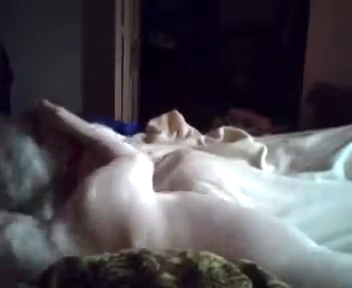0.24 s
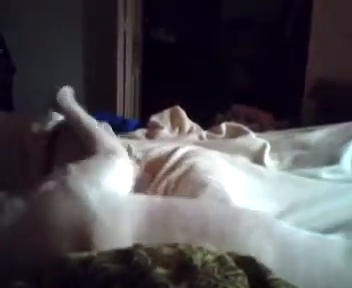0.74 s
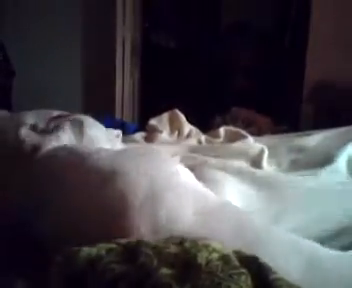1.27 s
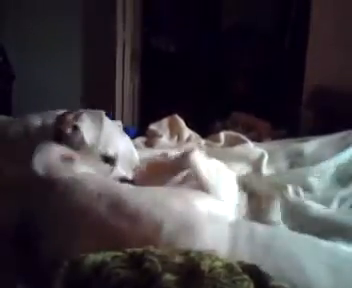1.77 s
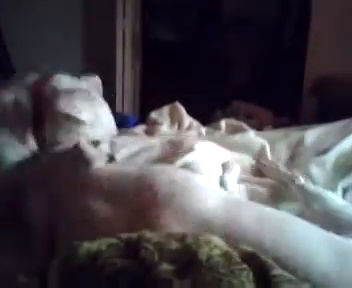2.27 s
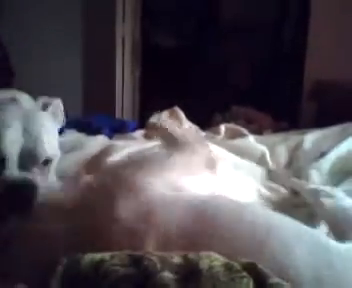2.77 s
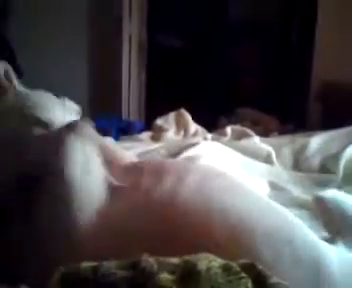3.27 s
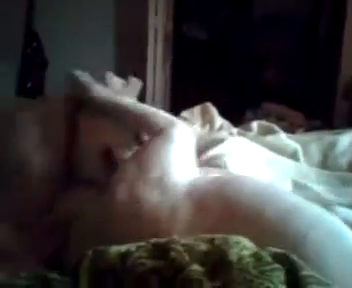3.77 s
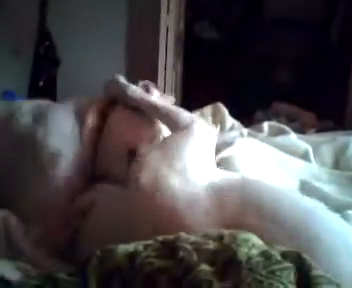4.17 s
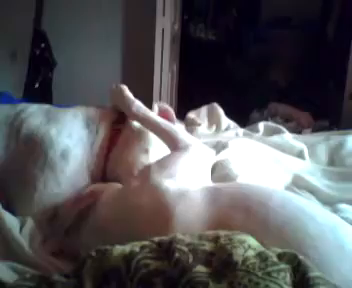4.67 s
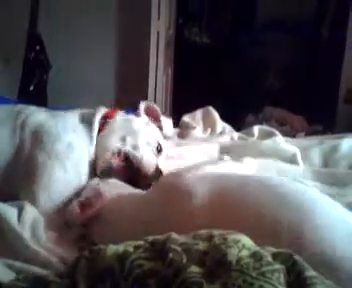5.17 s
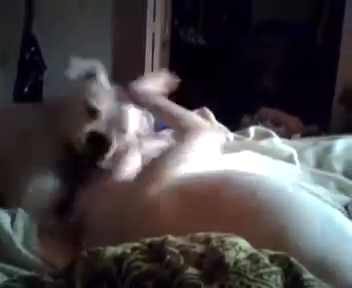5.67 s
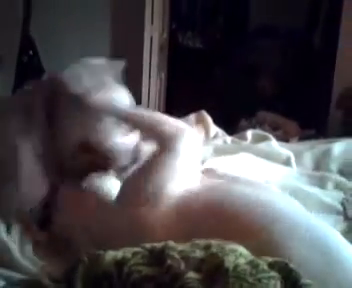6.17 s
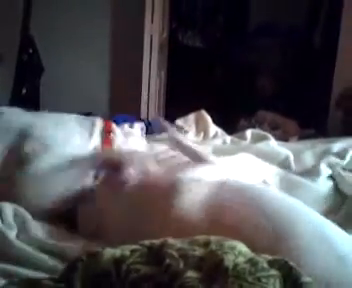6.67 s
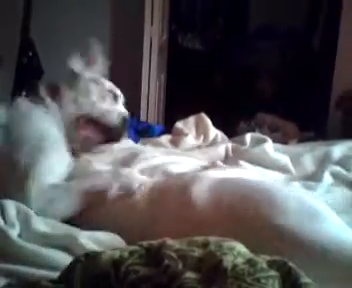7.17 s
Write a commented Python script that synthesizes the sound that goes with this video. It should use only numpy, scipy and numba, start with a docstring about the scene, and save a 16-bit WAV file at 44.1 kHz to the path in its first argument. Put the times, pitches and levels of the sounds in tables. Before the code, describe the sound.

A quiet bedroom with faint fan-like air, recorded close on a small, dull microphone. At 0.3 s a short gurgling growl flutters, then sheets rustle and paws thump softly on bedding until 1.3 s, with one wet click at 1.2. From 1.7 to 2.4 s a low, rattling growl runs with breathy hiss and mattress rumble. After a small snort at 2.6, a rougher, wetter growl builds from 2.8 to 3.4 s in rapid flaps and spit sizzles. The loudest low grunts come between 3.55 and 4.1 s, voiced and throaty, with hard jaw snaps around 3.9 to 4.0. A quieter crackling growl grumbles from 4.5 to 5.3 s, and another from 5.5 to 6.1. A sharp, wet snarl bursts at 6.2 s with teeth clicking. Padded thumps follow at 6.6 to 6.85, a clicking short grunt at 7.1, and a final hissy growl from 7.25.

```python
"""On a bed in a quiet room, close to a small camera, two young dogs wrestle.
Uneven vocal-fold slaps and puffs of noise ring chest, throat and mouth; a few grunts hold a clear note.
Slack tissue flaps open in bursts, spit sizzles, jaws snap, and air hisses past teeth and nostrils.
Paws thump, sheets rustle and the mattress rumbles in bands of noise, over a faint fan-like floor."""
import sys
import numpy as np
from scipy import signal
from scipy.io import wavfile
from scipy.ndimage import uniform_filter1d
from numba import njit

SR = 44100
rng = np.random.default_rng(int(sys.argv[2]) if len(sys.argv) > 2 else 0)


def wrap_up_sound(samples):
    """Save the sound to the file named by the first command line argument, as 16-bit audio."""
    columns = np.atleast_2d(samples).T
    # keep every value between -1 and 1, then stretch to whole-number steps
    tamed = np.clip(columns, -1, 1)
    steps = np.round(tamed * 32767).astype(np.int16)
    wavfile.write(sys.argv[1], SR, steps)


N = 327618
T = np.arange(N) / SR

# gusts of air past teeth and nostrils:
# (full from [t/s], hold [s], mouth jet [level/dB], jet centre [f/Hz], nostrils relative to mouth [dB])
HISS = [(0.07, 0.061, -78.5, 3790, -4.5), (0.26, 0.14, -71.5, 3650, -8), (0.89, 0.14, -75, 3660, -6.5),
        (1.208, 0.1, -81.5, 3570, 5.5), (1.729, 0.06, -61.5, 2860, -10), (1.779, 0.07, -61.5, 3580, -10),
        (2.397, 0.036, -65.5, 2600, -23), (2.577, 0.019, -67.5, 2780, -33), (2.844, 0.3, -80, 3580, -3),
        (3.265, 0.03, -64, 3410, -6), (3.35, 0.066, -72, 2870, -20), (3.506, 0.011, -59, 2810, -25),
        (3.611, 0.017, -65.5, 3800, -7.5), (4.323, 0.013, -78, 2850, -16), (5.184, 0.05, -69, 3420, -2.5),
        (5.29, .03, -72, 3300, 0), (5.807, 0.057, -60.5, 2770, -14), (5.885, .08, -64.5, 3710, -8.5),
        (6.194, .015, -60.5, 3660, -15), (6.222, 0.035, -54, 2840, -22), (6.258, .025, -59.5, 3210, -15),
        (6.34, .13, -72.5, 2990, -11), (7.276, 0.015, -63.5, 3210, -13.5), (7.359, 0.085, -59, 3580, -30)]
# slack tissue flapping open: (start [t/s], peak [level/dB], ring [f/Hz])
FLAPS = [(0.319, -33, 730), (.329, -44.5, 560), (.352, -38.5, 960), (.36, -44, 920), (.37, -42, 635),
         (.38, -43.5, 910), (1.237, -31, 1040), (1.694, -42, 1100), (1.83, -36, 614), (1.928, -39, 980),
         (1.965, -44, 633), (1.996, -40.5, 585), (2.049, -45, 750), (2.096, -41, 930), (2.171, -33, 775),
         (2.236, -41, 544), (2.554, -56, 606), (2.57, -39.5, 840), (2.811, -29.5, 935), (2.821, -47, 975),
         (2.862, -36, 880), (2.908, -32.5, 545), (2.966, -31, 630), (3.016, -29.5, 617), (3.061, -27, 720),
         (3.107, -35, 940), (3.148, -34.5, 910), (3.187, -29, 630), (3.234, -28.5, 930),
         (3.248, -27.5, 600), (3.263, -25.5, 960), (3.296, -27.5, 990), (3.357, -31, 670),
         (3.581, -32.5, 550), (3.611, -25.5, 510), (3.705, -27, 516), (3.833, -33.5, 560),
         (3.899, -27.5, 740), (3.95, -28.5, 582), (4.008, -24, 732), (4.16, -34, 546), (4.319, -35.5, 710),
         (4.56, -60, 530), (4.587, -37, 570), (4.644, -35, 597), (4.693, -41, 930), (4.743, -39, 470),
         (4.805, -44.5, 635), (4.85, -45, 990), (4.885, -37, 630), (4.931, -41, 536), (4.978, -42, 546),
         (5.035, -39, 970), (5.079, -45, 1000), (5.166, -47, 500), (5.243, -41, 560), (5.682, -43, 550),
         (5.832, -41, 1080), (6.195, -36, 500), (6.209, -39, 880), (6.22, -22.5, 617), (6.234, -21.5, 970),
         (6.249, -34.5, 1070), (6.275, -28.5, 614), (6.287, -31.5, 1000), (6.338, -40, 1190),
         (6.377, -39, 1150), (6.405, -50, 1220), (6.43, -35, 1060), (6.455, -41, 1090), (7.075, -32.5, 560),
         (7.085, -36, 478), (7.093, -34.5, 754), (7.245, -52, 996), (7.282, -33, 1100), (7.356, -33.5, 503)]
# clear grunts, one list of points each: (t/s, pitch [f/Hz], level/dB)
GRUNTS = [
    [(3.56, 85, -35.5), (3.575, 89.3, -41), (3.61, 104.4, -37), (3.64, 117.7, -44.5), (3.655, 125, -52)],
    [(3.675, 146.4, -47.5), (3.694, 155, -27.5), (3.708, 156, -19), (3.722, 157, -40), (3.73, 170, -24),
     (3.742, 173.7, -36.5), (3.76, 170, -48.5)],
    [(3.85, 134.5, -46), (3.874, 148, -27.5), (3.908, 155, -29.5), (3.924, 172.6, -27), (3.934, 178, -36.5),
     (3.944, 178, -28.5), (3.972, 161.8, -37), (3.988, 162, -29), (4.008, 185, -26), (4.024, 149, -47),
     (4.034, 123.4, -31.5), (4.046, 133, -31), (4.066, 148.5, -28), (4.084, 150, -36), (4.105, 150, -48.5)],
    [(7.076, 175, -58), (7.086, 175, -24.5), (7.104, 182.5, -50), (7.132, 185, -37), (7.15, 193, -71)],
]
# fixed throat resonances: (f/Hz, nominal width [Hz], relative level/dB)
THROAT = [(417, 310, -0.5), (560, 150, 4.5), (694, 330, 0.5)]
# muzzle resonances at rest: (f/Hz, nominal width [Hz], relative level/dB)
MUZZLE = [(975, 110, 1.5), (1081, 280, -4.5)]


def undb(db):
    """Decibels to an amplitude factor."""
    return 10 ** (np.asarray(db) / 20)


def unit(x):
    """Scale to an RMS level of 1."""
    return x / np.sqrt(np.mean(x ** 2))


def peak(x, db):
    """Scale to a peak level in dB."""
    return x * undb(db) / np.max(np.abs(x))


def noise():
    """White noise for the whole scene."""
    return rng.standard_normal(N)


def walk(rate):
    """Random levels held 1 / rate s and smoothed twice into a drift; standard deviation about 0.7."""
    k = int(SR / rate)
    steps = np.repeat(rng.standard_normal(N // k + 1), k)
    return 0.94 * uniform_filter1d(uniform_filter1d(steps, k), k)[:N]


def curves(tables):
    """A gate that is open while a table runs, then the columns joined in time with rounded corners."""
    s, *columns = np.concatenate(tables).T
    gate = 1. * sum((T >= table[0][0]) & (T < table[-1][0]) for table in tables)
    joined = [np.interp(T, s, column) for column in columns]
    return [uniform_filter1d(c, size=200) for c in [gate] + joined]


def swells(full_from, hold, db, rise_db_s, fall_db_s):
    """Level in dB of each swell: a steady climb, a hold, a steady fall."""
    late = T - full_from[:, None]
    climb = np.minimum(rise_db_s * late, 0)
    fall = fall_db_s * np.maximum(late - hold[:, None], 0)
    return db[:, None] + climb - fall


@njit
def svf(x, hz, width):
    """State-variable band-pass with a moving centre, gain 1 there."""
    y, b, l = np.empty(len(x)), 0., 0.
    for i in range(len(x)):
        g, k = np.tan(np.pi * hz[i] / SR), width / hz[i]
        v = (b + g * (x[i] + 1e-18 - l)) / (1 + g * (g + k))
        b, l, y[i] = 2 * v - b, l + 2 * g * v, k * v
    return y


def band(x, hz, width):
    """A resonance applied twice, so that its skirts are steep; the centre may be a curve, width is nominal."""
    if np.ndim(hz):
        return svf(svf(x, hz, 1.29 * width), hz, 1.29 * width)
    b, a = signal.iirpeak(hz, hz / width / 1.02, SR)
    return signal.lfilter(b, a, signal.lfilter(b, a, x))


def tract(x, modes):
    """Resonances in parallel, neighbours in opposite sign."""
    return sum((-1) ** k * undb(db) * band(x, hz, width) for k, (hz, width, db) in enumerate(modes))


def soft(x, hz):
    """Flesh meets flesh: a two-pole low-pass rounds the click."""
    return signal.sosfilt(signal.butter(2, hz, fs=SR, output="sos"), x)


def mattress():
    """Bodies shift on springs and padding: a deep uneven rumble on a slow sway of the air."""
    # bodies shifting: (loudest at [t/s], level/dB of the rumble band)
    shifts = [(0., -55), (.35, -58), (1.03, -55), (1.2, -53.5), (1.8, -46.5), (2.26, -54.5), (3.02, -66),
              (3.64, -49.5), (4.07, -47), (5.21, -66), (6., -58), (6.23, -57), (7.26, -56)]
    rest_db, rise_db_s, fall_db_s = -63, 98, 83
    s, db = np.transpose(shifts)
    level_db = swells(s, 0 * s, db, rise_db_s, fall_db_s).max(axis=0)
    rumble = unit(band(noise(), 25.0, 55.0))
    sway = 1.7 * unit(band(noise(), 9.7, 2.8))
    return undb(np.maximum(level_db, rest_db)) * (rumble + sway)


def floor():
    """Steady room air in gently flickering bands, with a few thin motor-like tones."""
    # spectrum of the air: (f/Hz, relative level/dB per Hz)
    air_spectrum = [(35, -30), (60, 0), (232, -6), (379, -11), (515, -11), (808, -17), (1010, -14),
                    (1320, -23), (1650, -25), (1790, -24), (2440, -31), (6390, -44), (8000, -55),
                    (10400, -85), (17600, -120)]
    # thin tones: (f/Hz, peak level/dB)
    whine = [(759.0, -88.5), (1012, -76), (1776, -82)]
    air_db = -62.5
    hz, db = np.transpose(air_spectrum)
    air = np.zeros(N)
    for f in 70 * 2 ** np.arange(0, 7, .5):  # half-octave steps
        band_db = np.interp(np.log(f), np.log(hz), db) + 3.7 * walk(1.4)
        air += undb(band_db) * band(noise(), f, f / 1.93)
    tones = np.zeros(N)
    for f, tone_db in whine:
        tones += undb(tone_db + 1.5 * walk(8)) * np.sin(2 * np.pi * f * T + 1.5 * walk(22))
    return undb(air_db) * unit(air) + tones


def gusts():
    """Level in dB of every gust of air over time."""
    full_from, hold, db = np.transpose(HISS)[:3]
    return swells(full_from, hold, db, rise_db_s=333.5, fall_db_s=306)


def hiss(puffs):
    """Air jets through teeth and nostrils: noise bands pulsing with the folds and sputtering."""
    pant_db, pant_nose_db = -87, -92  # air that passes all the time
    centre_hz, nose_share_db = np.transpose(HISS)[3:]
    gust_db = gusts()
    mouth_db = np.maximum(gust_db.max(axis=0), pant_db)
    nose_db = np.maximum((gust_db + nose_share_db[:, None]).max(axis=0), pant_nose_db)
    # the loudest gust sets the centre
    mouth_hz = uniform_filter1d(centre_hz[gust_db.argmax(axis=0)], size=800)
    jet = 0.31 + unit(puffs ** 0.96)
    mouth_air = jet * undb(3.5 * walk(90)) * noise()
    mouth = unit(band(mouth_air, mouth_hz * (1 + .05 * walk(30)), 750.))
    nose_air = jet * undb(5.4 * walk(70)) * noise()
    nose = unit(band(nose_air, 6140.0, 1700.0))
    return undb(mouth_db) * mouth + undb(nose_db) * nose


def thumps():
    """Paws and chins land on the bedding: a padded push and a few dying swings."""
    # landings: (start [t/s], peak [level/dB], ring [f/Hz], nominal ring length [s])
    landings = [(0.103, -51, 966, 0.038), (0.828, -47.5, 200, 0.027), (0.845, -44.5, 450, .012),
                (0.936, -41.5, 484, 0.019), (1.006, -49.5, 300, 0.019), (1.02, -41, 390, 0.013),
                (1.032, -45, 350, 0.016), (1.186, -33.5, 262, 0.016), (1.196, -36, 297, .015),
                (1.286, -40, 180, 0.029), (1.645, -41.5, 150, 0.069), (1.66, -38.5, 170, 0.06),
                (2.549, -39, 139, 0.042), (5.401, -49, 178, 0.025), (6.588, -35, 230, 0.061),
                (6.641, -45, 227, 0.047), (6.687, -47, 310, 0.031), (6.69, -33, 155, 0.036),
                (6.752, -33.5, 200, 0.035), (6.781, -36.5, 155, .04), (6.844, -41.5, 160, 0.065)]
    out, t = np.zeros(N + 4096), T[:4096]
    for s, db, hz, ring_s in landings:
        push = (t == t[1]) + 0.1 * rng.standard_normal(4096) * np.exp(-t / 0.0032)
        out[int(s * SR):][:4096] += peak(band(soft(push, 660.0), hz, 6.1 / ring_s), db)
    return out[:N]


def growl_controls():
    """Gate, chest level and opening over time, with what each growl keeps throughout."""
    # one row per growl: (nominal chest resonance [f/Hz], belly relative to chest [dB],
    # mouth relative to muzzle [dB], points of (t/s, chest level/dB, opening: muzzle relative to chest [dB]))
    growl_shapes = [ (200, 6, -2, [(0.275, -61, -33), (0.295, -43, -10), (0.359, -39.5, 2),
                    (0.411, -71.5, 4), (0.43, -75, -16)]), (170, 5.5, -15, [(1.232, -60.5, 11),
                    (1.3, -67, 10.5), (1.32, -92, -6)]), (211, -12.5, -15, [(1.55, -71, -30),
                    (1.6, -63, -34), (1.65, -58, -25.5), (1.682, -59, -23), (1.693, -40, -15),
                    (1.722, -41, -11.5), (1.77, -39, -8), (1.83, -36, -13.5), (1.87, -39.5, -12),
                    (1.91, -39.5, -8.5), (1.94, -38, -8.5), (1.98, -41, -11), (2.01, -41, -10.5),
                    (2.05, -39.5, -10), (2.085, -40, -8.5), (2.12, -40.5, -8), (2.17, -38.5, -12),
                    (2.215, -41, -11), (2.25, -42.5, -11), (2.306, -44, -9), (2.366, -46, -10),
                    (2.402, -59.5, 0.5), (2.444, -53, -0.5), (2.5, -97, -16)]),
                    (155, 6.5, -3, [(2.53, -64, -22), (2.568, -55.5, 8), (2.652, -94, 20),
                    (2.7, -91, -19)]), (204, -9.5, -12.5, [(2.8, -55, 2), (2.81, -43, 4),
                    (2.878, -48.5, -7), (2.926, -40, -22), (2.97, -37.5, -11.5), (3.005, -47, -14),
                    (3.03, -37, -14), (3.07, -43, 0), (3.102, -40.5, -8), (3.16, -41.5, -4),
                    (3.223, -33.5, -16)]), (200, -4.5, -9, [(3.224, -37, 2), (3.268, -36, 2.5),
                    (3.294, -39, -1), (3.33, -35, -5.5), (3.376, -44, -5.5), (3.5, -53, 2),
                    (3.549, -49.5, -8)]), (185, 0.5, -1.5, [(3.55, -65, 2), (3.574, -25.5, -19.5),
                    (3.67, -41, -10.5), (3.679, -40, -7)]), (172, -10.5, -5, [(3.68, -29.5, -5),
                    (3.706, -27, -24.5), (3.804, -59, -6.5), (3.819, -34.5, -18)]),
                    (175, -0.5, -5.5, [(3.82, -52, -10), (3.886, -24.5, -28.5), (4.0, -20.5, -39),
                    (4.032, -27, -21.5), (4.072, -22.5, -35.5), (4.109, -45, -10)]),
                    (202, -2, -4.5, [(4.11, -38.5, -13.5), (4.2, -48, -2.5), (4.248, -44, -10.5),
                    (4.299, -71, 16.5)]), (195, -2.5, -28, [(4.3, -52, -5), (4.334, -44, -16),
                    (4.362, -42.5, -6.5), (4.43, -85, -24)]), (197, -3.5, -16, [(4.5, -87, -22),
                    (4.538, -50.5, -31), (4.592, -39.5, -22), (4.618, -51.5, -17), (4.65, -46, -12.5),
                    (4.7, -43.5, -3.5), (4.735, -50.5, -0.5), (4.765, -45, -8), (4.81, -46, -15),
                    (4.828, -47, -11), (4.852, -38.5, -8), (4.894, -39, -6.5), (4.94, -38.5, -11.5),
                    (4.976, -43.5, -18), (5.015, -52, -15), (5.045, -41.5, -7.5), (5.092, -45.5, -5.5),
                    (5.139, -70, 5)]), (224, -3.5, -10, [(5.14, -57, 9), (5.174, -49.5, -3),
                    (5.22, -52.5, 4), (5.26, -56, 0.5), (5.304, -58, 2), (5.335, -69, 8), (5.37, -91, 14)]),
                    (185, -3.5, -4.5, [(5.46, -86, -24), (5.472, -55.5, -6.5), (5.628, -50.5, -8),
                    (5.65, -59, -7), (5.71, -40, -14), (5.756, -47, -5.5), (5.856, -43, -5),
                    (6.058, -43.5, -10), (6.11, -78, -9)]), (188, 3, -3, [(6.12, -77, 10),
                    (6.168, -66, 7.5), (6.192, -37.5, -7), (6.226, -29.5, -3.5), (6.285, -40.5, -7.5),
                    (6.31, -44, -7), (6.375, -41, -4), (6.416, -47.5, -2), (6.438, -50, 3), (6.49, -51, 2),
                    (6.53, -99, 5)]), (200, -7.5, -8, [(6.55, -99, -8), (6.588, -44, -31),
                    (6.654, -70, -30), (6.702, -45.5, -47), (6.866, -67.5, -37), (6.9, -56, -21)]),
                    (178, 1, -9, [(7.22, -74, -3), (7.246, -46, -1.5), (7.36, -42, -5),
                    (7.429, -48.5, -3)]), ]
    return curves([[(*row, hz, belly_db, mouth_db) for row in shape]
                   for hz, belly_db, mouth_db, shape in growl_shapes])


def folds(jitter, scatter_db, puff_s):
    """Rough vocal folds: slaps on a wandering beat, uneven in gap and force, each with a puff of air."""
    fold_hz = 125  # centre of the wandering beat
    gap, size, drift = rng.standard_normal((2000, 3)).T
    wander = .3 * uniform_filter1d(drift, size=12)
    at = np.cumsum(SR / fold_hz * np.exp(jitter * gap + wander)).astype(int)
    slaps = np.zeros(N)
    slaps[at[at < N]] = undb(scatter_db * size[at < N])
    puffs = signal.lfilter([1], [1, -np.exp(-1 / (puff_s * SR))], slaps)
    return unit(slaps), puffs


def valve(depth_db, shut_s):
    """The airway pinches shut just before each flap bursts open: a gain that sinks toward each start."""
    opens = np.zeros(N)
    opens[(np.array(FLAPS)[:, 0] * SR).astype(int)] = 1
    # a decay run backwards in time
    pinch = signal.lfilter([1], [1, -np.exp(-1 / (shut_s * SR))], opens[::-1])[::-1]
    return undb(-depth_db * pinch)


def growls():
    """Slaps and breath ring belly, chest, throat, muzzle and, as the jaws open, the mouth."""
    # resonances that lips, tongue and ribs move: points of (t/s, muzzle f/Hz, tongue f/Hz, upper chest f/Hz)
    shaping = [
        [(0.28, 918, 543, 255), (0.32, 930, 620, 235.6), (0.356, 995, 613, 253), (0.43, 976, 672, 232)],
        [(1.68, 973, 571, 244), (1.752, 1075, 573, 255.5), (1.792, 956, 559, 260.5), (1.968, 996, 590, 224),
         (2.026, 974, 659, 232.4), (2.112, 994, 596, 261.4), (2.148, 947, 652, 230), (2.314, 970, 640, 258),
         (2.358, 932, 543, 224), (2.45, 983, 542, 258)],
        [(2.8, 943, 546, 255), (2.864, 922, 578, 226), (2.914, 862, 609, 270.5), (2.998, 832, 623, 234),
         (3.078, 960, 635, 267), (3.124, 917, 560, 220), (3.222, 990, 639, 234.5), (3.366, 933, 660, 223),
         (3.51, 986, 567, 236), (3.55, 1040, 647, 231)],
        [(3.56, 910, 538, 239), (3.634, 922, 539, 241.4), (3.672, 961, 604, 206), (3.81, 910, 554, 209),
         (4.03, 866, 640, 211), (4.076, 854, 562, 206.4), (4.148, 908, 607, 259), (4.232, 929, 560, 233),
         (4.364, 902, 710, 235), (4.42, 890, 684, 226)],
        [(4.53, 942, 522, 224.3), (4.634, 892, 599, 226), (4.784, 1053, 542, 216), (4.836, 987, 610, 223),
         (4.94, 1005, 575, 235.6), (4.998, 946, 530, 231), (5.048, 987, 632, 226), (5.17, 1023, 494, 244),
         (5.232, 1016, 538, 263), (5.35, 1043, 592, 240)],
        [(5.47, 1015, 558, 232), (5.502, 980, 542, 224), (5.542, 986, 653, 203), (5.648, 1005, 547, 211),
         (5.742, 1007, 675, 235), (5.782, 1064, 546, 224), (5.858, 1052, 543, 214), (5.924, 990, 522, 218),
         (5.982, 1032, 594, 221), (6.1, 990, 546, 212.5)],
        [(6.19, 1012, 570, 240), (6.244, 1032, 555, 222.6), (6.354, 1020, 584, 235.5), (6.384, 1050, 540, 216),
         (6.442, 1010, 561, 232), (6.5, 1038, 560, 214.7)],
        [(7.24, 997, 601, 231), (7.296, 982, 584, 234), (7.338, 1096, 520, 236), (7.38, 1130, 526, 246),
         (7.42, 990, 561, 242)],
    ]
    # open-mouth resonances: (nominal f/Hz, nominal width [Hz], relative level/dB)
    mouth_modes = [(1317, 490, 12), (1914, 170, 5.5), (2084, 150, 6.5)]
    throat_share_db, throat_per_opening = -4, 0.56  # the throat follows the opening only in part
    gust_mouth_db = 5.5  # a gust rings the open mouth at least this far above its own hiss
    breathy = .2  # share of noisy puffs in the source

    gate, chest_db, opening_db, chest_hz, belly_share_db, mouth_share_db = growl_controls()
    belly_db = chest_db + belly_share_db
    muzzle_db = chest_db + opening_db
    throat_db = chest_db + throat_share_db + throat_per_opening * opening_db
    mouth_db = np.maximum(muzzle_db + mouth_share_db, gusts().max(axis=0) + gust_mouth_db)
    _, muzzle_hz, tongue_hz, ribs_hz = curves(shaping)
    chest_hz = chest_hz * (1 + 0.088 * walk(14.))

    slaps, puffs = folds(jitter=.17, scatter_db=2., puff_s=.005)
    breath = unit(soft(puffs * noise(), 1000.0))
    source = (1 - breathy) * unit(soft(slaps, 1300.0)) + breathy * breath
    airway = valve(depth_db=13.0, shut_s=.016)
    source *= undb(1.5 * walk(60)) * airway

    upper_chest = band(source, ribs_hz * (1 + 0.04 * walk(15.0)), 100.0)
    chest = unit(band(source, 0.78 * chest_hz, 85.0) - 0.89 * upper_chest)
    belly = unit(band(source + 0.65 * noise(), 92.3, 71.0))
    # the working tongue slides one resonance about among the fixed ones
    tongue = band(source, tongue_hz * (1 + 0.056 * walk(25.0)), 99.0)
    throat = unit(2.5 * tongue - tract(source, THROAT))
    # the lips curl: the muzzle modes shift together, the lip mode also on its own
    curl = muzzle_hz / MUZZLE[0][0] * (1 + 0.022 * walk(22.0))
    lips = band(source, 1.084 * muzzle_hz * (1 + 0.084 * walk(12)), 200.)
    muzzle_source = source + 0.5 * airway * unit(puffs) * noise()
    muzzle = unit(tract(muzzle_source, [(hz * curl, w, db) for hz, w, db in MUZZLE]) + 1.03 * lips)
    mouth_source = source + 2.1 * (1.2 + unit(puffs)) * airway * noise()
    moving_modes = [(hz * (1 + 0.064 * walk(16)), w, db) for hz, w, db in mouth_modes]
    mouth = unit(tract(mouth_source, moving_modes))

    # while the folds lock into a clear grunt the rough chest tone gives way
    locked = curves(GRUNTS)[0]
    low = (1 - .87 * locked) * (undb(chest_db) * chest + undb(belly_db) * belly)
    high = undb(throat_db) * throat + undb(muzzle_db) * muzzle + undb(mouth_db) * mouth
    return gate * (low + high), puffs


def spurts():
    """Spit and air between the lips: short bright sizzles of noise; also one faint, very short thin tone."""
    # sizzles: (start [t/s], peak [level/dB], centre [f/Hz], upper band relative to that peak [dB])
    sizzles = [(0.2853, -46, 3700, -16), (0.298, -46, 3500, -30), (1.702, -74, 3300, -15),
               (1.73, -51, 3800, -19), (1.761, -46.5, 3700, -11), (1.797, -43.5, 3570, -14),
               (1.829, -52, 3550, -17), (1.876, -61.5, 3200, 3), (1.988, -64, 2500, -30.5),
               (2.095, -63, 3300, -20), (2.243, -61, 2460, -20), (2.571, -50, 2620, -36),
               (2.998, -55, 3720, -23), (3.015, -48.5, 3470, -15), (3.062, -48.5, 3500, -16),
               (3.111, -54, 3520, -19), (3.146, -48, 3300, -39), (3.193, -48.5, 2880, -11.5),
               (3.157, -49, 2780, -32), (3.258, -53, 3000, -24), (3.277, -42, 3480, -6),
               (3.293, -47, 3720, -0.5), (3.504, -47, 2750, -29), (3.609, -46.5, 3950, -3),
               (3.9512, -50.5, 2560, -41), (4.009, -49, 2480, -24), (4.348, -46.5, 2430, -35),
               (5.196, -49.5, 3140, -2), (5.7895, -48.5, 2780, -13), (5.827, -48.5, 2860, -6),
               (6.1908, -44.5, 2660, -10), (6.207, -42, 2670, -32), (6.2225, -38, 3070, -8),
               (6.235, -42, 3600, -15), (6.256, -47, 3160, -1), (6.287, -45.5, 3000, -12),
               (6.319, -59.5, 3200, -12), (6.338, -45, 2890, -39), (6.3736, -46, 3070, -46),
               (6.4, -48, 2850, -28.5), (6.428, -52, 2950, -17), (6.454, -46.5, 3226, -15),
               (7.3557, -43.5, 3290, -8.5), (7.3933, -40.5, 3300, -3)]
    # one faint, very short thin tone near 2900 Hz: (middle [t/s], f/Hz, peak level/dB, half length [s])
    thin_tone = (2.665, 2900, -64, .008)
    rise_s, fade_s = 0.0017, 0.0061
    out, t = np.zeros(N + 2048), T[:2048]
    for s, db, hz, upper_db in sizzles:
        puff = rng.standard_normal(2048) * (1 - np.exp(-t / rise_s)) * np.exp(-(t / fade_s) ** 2)
        lower = peak(band(puff, hz, 600.0), db)
        upper = peak(band(puff, 5930.0, 1300.0), db + upper_db)
        out[int(s * SR):][:2048] += lower + upper
    s, hz, db, half_s = thin_tone
    swell = np.exp(-((T - s) / half_s) ** 2)
    return out[:N] + undb(db) * swell * np.sin(2 * np.pi * hz * T)


def flaps():
    """Each flap of slack tissue lets out a soft click and a dying puff that ring throat and chest."""
    puff_s, rise_s, puff_per_gap = .01, .0025, .3  # a quick run of flaps shortens each puff
    above_growl_db, chest_top_db = 5, -30.5  # chest thud: above the growl around it, up to a ceiling
    out, t, growl_db = np.zeros(N + 4096), T[:4096], growl_controls()[1]
    gaps = np.diff(np.array(FLAPS)[:, 0], append=N / SR)
    for (s, db, hz), gap in zip(FLAPS, gaps):
        at = int(s * SR)
        fade = np.exp(-t / min(puff_s, puff_per_gap * gap))
        puff = 0.2 * rng.standard_normal(4096) * fade * (1 - np.exp(-t / rise_s))
        click = 2.56 * (t == t[20])
        burst = soft(puff + click, 1000.0)
        ring = peak(band(burst, hz, 300.0) - 0.23 * tract(burst, THROAT + MUZZLE), db)
        thud = peak(band(burst, 190., 210.0), min(growl_db[at] + above_growl_db, chest_top_db))
        out[at:][:4096] += ring + thud
    return out[:N]


def rustle():
    """Sheets dragged over each other: a dull, grainy scrape of band noise."""
    # drags: (full from [t/s], hold [s], level/dB)
    drags = [(0.653, .02, -72.5), (0.696, .01, -69.5), (0.775, 0.039, -70.5), (1.112, 0.058, -71),
             (7., 0.016, -66)]
    slope_db_s = 253
    full_from, hold, db = np.transpose(drags)
    level_db = swells(full_from, hold, db, slope_db_s, slope_db_s).max(axis=0)
    grain = undb(5.7 * walk(150)) * noise()
    return undb(level_db) * unit(band(grain, 980.0, 1300.))


def snaps():
    """Teeth meet as the jaws snap dry: a sharp tick with a short bony ring."""
    # bites: (start [t/s], peak [level/dB])
    bites = [(1.236, -40), (2.813, -36.5), (2.821, -36), (2.908, -52), (3.9, -27), (3.952, -25),
             (4.01, -22), (4.35, -32), (5.474, -37.5), (6.209, -33), (6.2205, -32), (6.237, -24.5),
             (6.291, -32), (6.318, -40), (6.456, -42), (7.0759, -28.5), (7.0834, -29), (7.093, -27.5)]
    # resonances of the jaws: (f/Hz, nominal width [Hz], relative level/dB)
    jaw_modes = [(705, 2530, 22), (1550, 2320, 20.5), (3300, 3900, 7)]
    out, t = np.zeros(N + 2048), T[:2048]
    for s, db in bites:
        tick = (t == t[1]) + 0.15 * rng.standard_normal(2048) * np.exp(-t / 0.0024)
        rounded = soft(soft(tick, 1600.0), 3300.0)
        out[int(s * SR):][:2048] += peak(tract(rounded, jaw_modes), db)
    return out[:N]


def grunts():
    """The folds lock into a steady swing: a nearly pure, slightly wavering note with two weak overtones."""
    gate, hz, db = curves(GRUNTS)
    phase = 2 * np.pi * np.cumsum(hz * (1 + 0.049 * walk(90))) / SR
    level = np.sqrt(2) * undb(db + 1.2 * walk(90))
    second = undb(-21 + 3 * walk(60)) * np.cos(2 * phase)
    third = undb(-26 + 4 * walk(60)) * np.sin(3 * phase + 1)
    return gate * level * (np.sin(phase) + second + third)


def room(x):
    """A small soft-furnished bedroom: a short dull tail of decaying noise."""
    tail_db, t60_s = -15.5, 0.14
    t = T[:SR // 4]
    tail = rng.standard_normal(len(t)) * np.exp(-np.log(1000) * t / t60_s) * (t > .004)
    tail = signal.lfilter([1], [1, -.85], tail)
    tail /= np.sqrt(np.sum(tail ** 2))
    return x + undb(tail_db) * signal.fftconvolve(x, tail)[:N]


def scene():
    """Dogs and sheets ring the room; thumps, mattress and floor are added without its tail."""
    voice, puffs = growls()
    dogs = voice + grunts() + hiss(puffs) + flaps() + spurts() + snaps()
    # side pockets of the throat swallow a band between the two hisses
    pocket_hz, pocket_width_hz, pocket_share = 4660, 500, 0.42
    b, a = signal.iirpeak(pocket_hz, pocket_hz / pocket_width_hz, SR)
    dogs = dogs - pocket_share * signal.lfilter(b, a, dogs)
    return (room(dogs + rustle()) + thumps() + mattress() + floor())[None]


def record(dry):
    """A small camera: the treble sags near 7 kHz and ends at 8, over a trace of circuit noise."""
    top_hz, self_noise_db = 8000, -100.5
    dull = signal.sosfilt(signal.butter(4, 6900, fs=SR, output="sos"), dry)
    cut = signal.sosfilt(signal.ellip(6, .2, 60, top_hz, fs=SR, output="sos"), dull)
    return cut + undb(self_noise_db) * noise()


dry = scene()
out = record(dry)
wrap_up_sound(out)
```